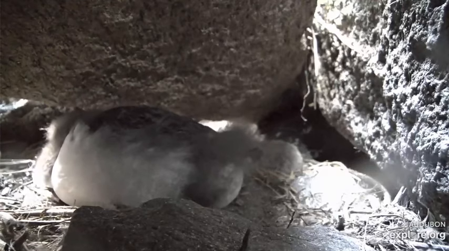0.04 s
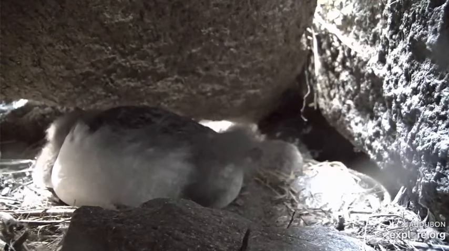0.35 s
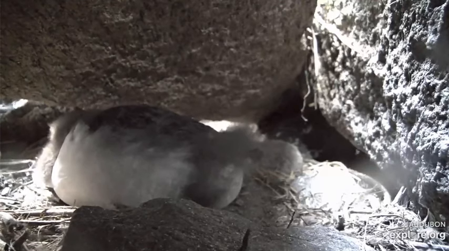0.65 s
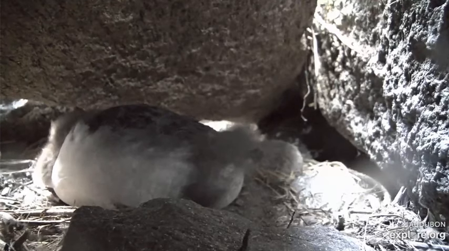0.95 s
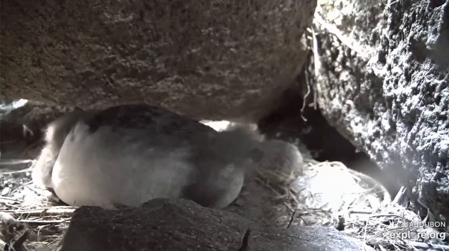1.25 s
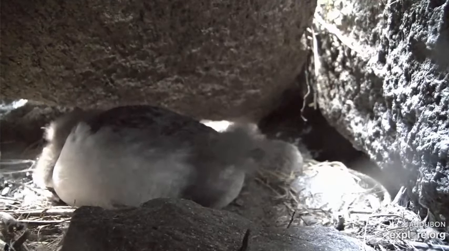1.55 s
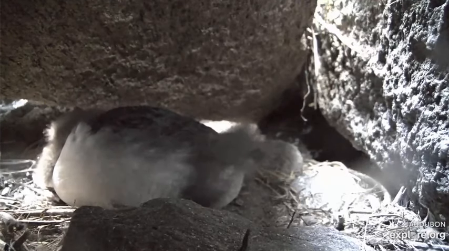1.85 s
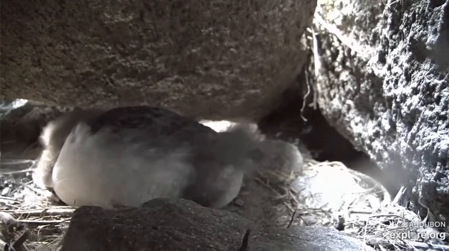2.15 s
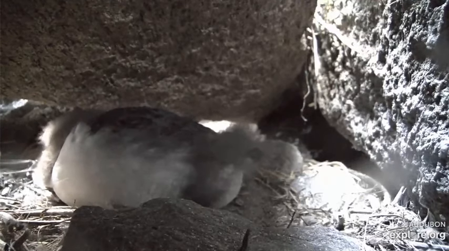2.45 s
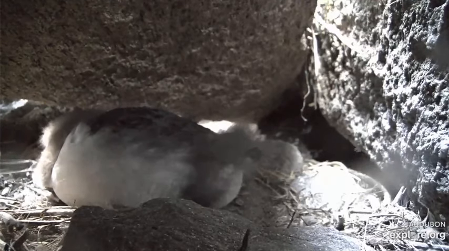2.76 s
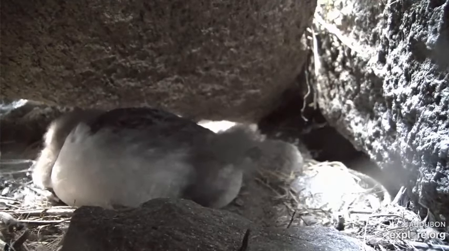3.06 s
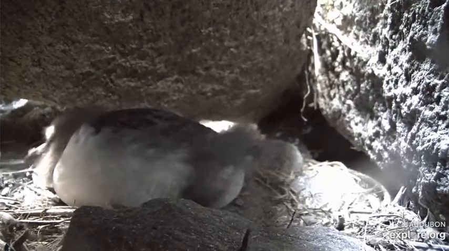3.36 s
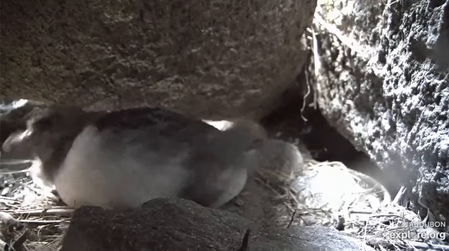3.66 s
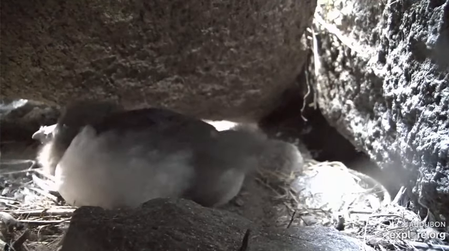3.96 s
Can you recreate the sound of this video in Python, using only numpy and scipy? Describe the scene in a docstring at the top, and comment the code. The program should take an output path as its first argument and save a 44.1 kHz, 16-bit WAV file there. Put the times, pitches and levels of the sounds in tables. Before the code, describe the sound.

Rapid dry knocks and scuffs, about twelve a second, ring briefly inside a stone burrow, thinning a little after 2 seconds. A seabird's whistle falls and breaks into a pulsing rasp in the first half second, the loudest call. Others come around 1.2, 2.7 and 3.7 seconds, with fainter trembling calls near 2 seconds. A dull shore hush and very faint microphone hiss lie underneath.

```python
"""Inside a seabird burrow under boulders, heard from a camera's microphone in the stone cavity.
A rapid run of dry knocks and scuffs, about twelve a second, rings briefly off the rock.
Seabirds give long calls that start as a clean whistle, fall in pitch and break into a pulsing rasp.
Under it lie the dull hush of the shore outside and the camera's own faint hiss and whine."""
import sys
import numpy as np
from scipy import signal
from scipy.fft import rfft, irfft, next_fast_len
from scipy.io import wavfile
from scipy.ndimage import uniform_filter1d, map_coordinates

SR = 44100
rng = np.random.default_rng(int(sys.argv[2]) if len(sys.argv) > 2 else 0)


def dump(signal):
    """Clip the signal to [-1, 1] and save it as 16-bit WAV at the path in sys.argv[1]."""
    limited = np.clip(np.atleast_2d(signal).T, -1, 1)
    pcm = np.round(limited * 32767).astype(np.int16)
    wavfile.write(sys.argv[1], SR, pcm)


N = 176400


def amp(db):
    """Decibels to gain."""
    return 10 ** (np.asarray(db) / 20)


def along(points, hz):
    """Read (Hz, value) points on a log frequency axis."""
    freqs, values = np.transpose(points)
    return np.interp(np.log(hz + 1), np.log(freqs + 1), values)


def wobble(rate, size):
    """A smooth random curve, rate knots a second."""
    return map_coordinates(rng.standard_normal(8192), [np.arange(size) * rate / SR], mode="wrap")


def causal(gain):
    """The minimum-phase response with this gain: it rings only after it is struck."""
    cepstrum = irfft(np.log(np.maximum(gain, 1e-6)))
    half = len(cepstrum) // 2
    cepstrum[1:half] *= 2
    cepstrum[half + 1:] = 0
    return np.exp(rfft(cepstrum))


def add(track, start_s, sound):
    """Mix a sound into the track from start_s."""
    i = max(0, round(start_s * SR))
    track[i:i + len(sound)] += sound[:len(track[i:])]


# The cavity's resonances at the microphone. Each row: frequency in Hz, relative gain in dB.
CAVITY_COLOUR = [(60, -50), (130, -30.5), (195, -27), (270, -16.5), (440, -20.5), (590, -18.5),
                 (660, -10.5), (735, -17.5), (795, -13), (860, -14.5), (980, -4), (1230, 2), (1350, -5.5),
                 (1510, -15.5), (1680, -16.5), (1880, -1.5), (2100, -1.5), (2300, -11), (2550, -3),
                 (2820, -2.5), (3250, -16.5), (3550, -17.5), (3800, -24), (4600, -22), (5100, -13),
                 (5550, -12), (6050, -19.5), (6600, -41.5), (8000, -55.5), (12000, -74)]
# The shore outside, before the cavity colours it. Each row: frequency in Hz, relative level in dB.
SHORE_COLOUR = [(20, -7), (48, 26.5), (105, 24), (290, 3), (500, 4), (800, -2), (1220, -5.5), (1600, 1),
                (2000, -2), (2900, 2.5), (4000, 2.5), (5600, -8.5), (7000, 15)]


def shore_hush():
    """The shore heard from under the boulders: dull noise through the cavity, swaying slightly."""
    size = next_fast_len(N + SR // 2)
    hz = np.fft.rfftfreq(size, 1 / SR)
    colour = amp(along(CAVITY_COLOUR, hz) + along(SHORE_COLOUR, hz))
    hush = irfft(rfft(rng.standard_normal(N), size) * colour, size)[:N]
    level_db = -67.5 + 1.3 * wobble(7.4, N)
    return amp(level_db) * hush / np.sqrt(np.mean(hush ** 2))


def camera_noise(hiss_db=-94.5, whine_db=-89, whine_hz=15735):
    """Right at the microphone: the camera's white hiss and a thin, high whine."""
    hiss = amp(hiss_db) * rng.standard_normal(N)
    whine = np.sqrt(2) * np.sin(2 * np.pi * whine_hz * np.arange(N) / SR)
    return hiss + amp(whine_db + 2.5 * wobble(34, N)) * whine


# Where thud, knock, clack and tick meet. Each entry: a crossover in Hz.
CROSSOVERS_HZ = [627, 1834, 4160]
# Knocking inside the burrow. Each row: time in seconds, then thud, knock, clack and tick levels in dB.
CONTACTS = [(0.058, -95, -60.5, -52.5, -63.5), (0.132, -72, -61.5, -50.5, -67),
            (0.216, -84, -55, -49.5, -60.5), (0.226, -73, -50.5, -42.5, -56),
            (0.373, -67.5, -68, -44, -71.5), (0.521, -71, -48.5, -51.5, -66.5), (0.583, -75, -54, -51, -59),
            (0.595, -64.5, -41.5, -51, -60.5), (0.659, -71, -50.5, -49.5, -57.5),
            (0.673, -67.5, -49, -71, -68.5), (0.748, -71, -52.5, -57, -75), (0.811, -78, -45.5, -46, -49.5),
            (0.825, -66, -38.5, -46, -56.5), (0.896, -64.5, -50, -51.5, -67),
            (0.959, -98, -49.5, -56, -51.5), (0.974, -68.5, -46, -45, -64), (1.05, -65.5, -47, -41.5, -58),
            (1.125, -70.5, -42.5, -41.5, -63.5), (1.199, -77.5, -51, -38, -58),
            (1.211, -68, -43.5, -43, -53.5), (1.281, -75, -45, -43, -65), (1.293, -63.5, -46.5, -51, -57.5),
            (1.364, -77, -45, -46, -59), (1.377, -61, -42.5, -41.5, -53.5),
            (1.458, -72, -46.5, -49.5, -67.5), (1.531, -77.5, -54.5, -48, -70),
            (1.541, -54.5, -41.5, -39.5, -51), (1.617, -72, -58, -43.5, -55), (1.629, -68, -48.5, -45, -63),
            (1.717, -66.5, -53.5, -51.5, -56.5), (1.789, -77, -47.5, -53.5, -57),
            (1.805, -65, -51.5, -51, -63), (1.895, -75, -56, -69, -71), (1.984, -73, -51.5, -57, -76),
            (2.072, -72, -60, -57.5, -78), (2.238, -67.5, -58, -52, -73), (2.321, -71.5, -40, -46, -76),
            (2.328, -70, -46, -38, -52.5), (2.503, -82, -55, -59.5, -66.5), (2.59, -70.5, -40, -72.5, -72),
            (2.596, -80, -51, -41.5, -54.5), (2.685, -86, -68.5, -56, -75), (2.769, -77, -59, -61, -65),
            (2.861, -77, -63.5, -50, -67), (2.946, -58, -45, -37, -56), (3.036, -73.5, -71, -54.5, -72),
            (3.128, -75, -61.5, -64, -70), (3.216, -63, -43, -51, -62.5), (3.307, -69.5, -48.5, -53, -63.5),
            (3.491, -64, -37.5, -41.5, -54.5), (3.574, -83.5, -59.5, -71.0, -74.5),
            (3.757, -66, -47.5, -64, -71), (3.763, -79, -48.5, -43, -64), (3.859, -76, -46, -47, -59)]


def knocks(dull_hz=6950, ripple_db=4, ripple_spacing_hz=167.95):
    """Each contact is a short crunch in a softer scuff, cavity-coloured, with its own four band levels."""
    size, pre_s, lead_s = 8192, 0.03, 0.0028
    level_s = 0.008  # a band's level is its energy spread over this time
    t = np.arange(size) / SR - pre_s
    hz = np.fft.rfftfreq(size, 1 / SR)

    def swell(rise_s, t60_s):
        return amp(np.where(t < 0, 10 * t / rise_s, -60 * t / t60_s))

    blow = swell(rise_s=0.0018, t60_s=0.035)
    scuff = amp(-5) * swell(rise_s=0.0027, t60_s=0.07)
    lowpasses = [1 / (1 + (hz / edge) ** 20) for edge in CROSSOVERS_HZ]
    cavity = amp(along(CAVITY_COLOUR, hz)) / np.sqrt(1 + (hz / dull_hz) ** 10)
    bands = np.diff([np.zeros_like(hz), *lowpasses, np.ones_like(hz)], axis=0) * cavity
    out = np.zeros(N)
    for time_s, *levels_db in CONTACTS:
        grain = amp(4 * wobble(300, size))
        crunch = rfft((blow + scuff * grain) * rng.standard_normal(size))
        # each contact excites the resonances differently
        crunch *= causal(amp(ripple_db * wobble(SR * hz[1] / ripple_spacing_hz, len(hz))))
        band_rms = np.linalg.norm(irfft(crunch * bands), axis=1) / np.sqrt(level_s * SR)
        colour = (amp(levels_db) / band_rms) @ bands
        add(out, time_s - lead_s - pre_s, irfft(crunch * causal(colour)))
    return out


# The third harmonic comes out as the whistle rises. Each row: pitch in Hz, added gain in dB.
THIRD_LIFT = [(1400, -54.5), (1500, -39.5), (1620, -20.5), (1670, 4), (1700, 3.5)]


def seabird_call(fundamental_db, third_db, grit_db, flutter, contour):
    """Start time and sound of a trembling whistle that roughens into jitter, throb, rasp and grit."""
    throb_hz, tremble_hz, grit_hz = 64.36, 52.14, 3464
    fade_s, break_roughness = 0.0031, 0.19
    times, *columns = np.transpose(contour)
    t = np.arange(times[0] - fade_s, times[-1] + fade_s, 1 / SR)
    n = len(t)
    curves = [np.interp(t, np.sort(times), column) for column in columns]
    pitch, second_db, rough = uniform_filter1d(curves, round(fade_s * SR))
    rough = np.clip(rough, 0, 1)
    depth = np.sqrt(rough)

    def drifting_beat(hz):
        return np.sin(2 * np.pi * np.cumsum(hz * (1 + 0.14 * wobble(50, n))) / SR)

    def noise_around(angle, rate):
        return wobble(rate, n) * np.sin(angle) + wobble(rate, n) * np.cos(angle)

    throb, tremble = drifting_beat(throb_hz), drifting_beat(tremble_hz)
    jitter = 0.063 * wobble(900, n)
    phase = 2 * np.pi * np.cumsum(pitch * (1 + depth * (jitter + 0.017 * throb))) / SR
    broken = amp(-31) * np.clip(rough / break_roughness, 0, 1)  # overtones of the breaking voice
    third = broken + amp(third_db + along(THIRD_LIFT, pitch))
    harmonics = {1: amp(fundamental_db), 2: 1, 3: third, 4: broken, 6: broken * amp(-25)}
    rasp_share = 0.92 * rough
    voice = np.zeros(n)
    for k, gain in harmonics.items():
        whistle = np.sqrt(2 * (1 - rasp_share)) * np.sin(k * phase)
        rasp = np.sqrt(rasp_share) * noise_around(k * phase, rate=375 if k == 1 else 750)
        voice += gain * (whistle + rasp)
    puffs = depth * (1 + throb) / 2  # each throb sounds a noisy upper resonance
    grit = amp(grit_db) * puffs * noise_around(2 * np.pi * grit_hz * t, rate=520)
    from_edge_s = np.minimum(t - t[0], t[-1] - t)
    fade = np.sin(np.pi / 2 * np.clip(from_edge_s / fade_s, 0, 1)) ** 2
    pulsing = (1 + 0.85 * depth * throb) * (1 + flutter * (1 - depth) * tremble)
    return t[0], (amp(second_db) * voice + grit) * fade * pulsing


# Birds heard in the burrow. Each row: fundamental and third harmonic (before its lift) in dB against
# the second, grit gain in dB, flutter from 0 to 1, contour. Each contour row: time in seconds,
# pitch in Hz, second harmonic level in dB, roughness from 0 (clean) to 1 (fully rough).
CALLS = [ (-15.5, -9.5, -66.5, 0.042, [(.078, 1300, -46, 0.07), (.096, 1587, -41, 0), (.112, 1629, -40, 0),
         (.166, 1550, -33, 0), (.182, 1514, -36.5, 0.02), (.215, 1491, -42.5, 0), (.25, 1544, -38.5, 0),
         (.287, 1441, -37, 0.1), (.305, 1325, -33, 0.14), (.335, 1305, -35.5, 0.22), (.37, 1248, -42, 0.42),
         (.4, 1232, -44, 0.94), (.436, 1355, -43.5, 1.04), (.46, 1326, -64, 0.3)]),
         (-14, -10, -92, 0.69, [(.545, 1334, -53, 0), (.582, 1217, -56.5, 0.3)]),
         (-16, -2, -81, .1, [(1.145, 1640, -59, 0), (1.18, 1570, -67, 0), (1.21, 1505, -59, 0.01),
         (1.28, 1487, -53, 0.08), (1.326, 1454, -54, 0.02), (1.338, 1356, -45.5, 0.04),
         (1.385, 1212, -48.5, 0.12), (1.425, 1185, -51, 0.26), (1.47, 1069, -52.5, 0.37)]),
         (-7.5, -1.5, -84, 0.92, [(1.81, 1734, -76, 0), (1.85, 1766, -71.5, 0.14), (1.93, 1720, -79, 0),
         (2.035, 1590, -67.5, 0.24)]), (-23.5, -2, -73, 0.94, [(2.045, 1220, -61.5, 0.37),
         (2.1, 1380, -64, 0.52), (2.19, 1420, -55.5, 0.15), (2.28, 1444, -72.5, .9)]),
         (-27, -24, -76, 0.52, [(2.19, 1770, -67, 0), (2.26, 1700, -76, 0.2), (2.305, 1760, -74, 0.01),
         (2.355, 1610, -74, 0), (2.41, 1460, -57.5, 0), (2.46, 1460, -76, 0.52), (2.53, 1466, -66.5, 0),
         (2.565, 1460, -77, 0.14)]), (-31, -25, -78, 0.52, [(2.3, 1280, -66, .3), (2.46, 1250, -71, 0.36)]),
         (-25, -4.5, -57.5, 0.61, [(2.653, 1700, -56.5, 0.01), (2.688, 1787, -61.5, 0),
         (2.735, 1720, -54, 0.01), (2.79, 1683, -63, 0.05), (2.815, 1660, -59, 0.2), (2.847, 1550, -47, 0),
         (2.856, 1315, -44, 0.2), (2.91, 1340, -44.5, 0.19), (2.95, 1363, -46, 0.41),
         (3.01, 1382, -47.5, 0.52), (3.06, 1373, -56, 0.85), (3.102, 1364, -66, 0.7)]),
         (8, -1, -89, 0.27, [(3.15, 1570, -82, 0.1), (3.175, 1619, -80, 0.08), (3.38, 1573, -78, 0.02)]),
         (-15, -17, -82, 0.46, [(3.385, 1300, -59.5, 0.2), (3.41, 1204, -64, 0.25)]),
         (-43, 8, -72, 0.25, [(3.666, 1080, -51, 0.11), (3.68, 1025, -54.5, 0.11)]),
         (-24, -10, -77, .5, [(3.69, 1450, -66.5, 0.86), (3.87, 1430, -59.5, 0.46)]),
         (-16, 10, -72, 0.56, [(3.695, 1564, -61.5, 0.11), (3.714, 1715, -64, 0), (3.77, 1700, -65, 0.03),
         (3.83, 1685, -75, 0.04), (3.87, 1620, -50, .08), (3.895, 1477, -42.5, .17),
         (3.935, 1324, -37.5, 0.19), (3.975, 1360, -45, 0.1), (4, 1420, -40.5, 0)]),
         (-8, -1, -76, 0.41, [(3.964, 1700, -57, 0.11), (4, 1770, -57.5, 0.05)]), ]
# Echoes off boulders near the microphone. Each row: delay in seconds, gain in dB.
BOULDER_ECHOES = [(.0047, -16), (0.02, -18.5)]


def seabirds():
    """Each call reaches the microphone directly, then again off the boulders."""
    out = np.zeros(N)
    for row in CALLS:
        start_s, voice = seabird_call(*row)
        add(out, start_s, voice)
        for delay_s, db in BOULDER_ECHOES:
            add(out, start_s + delay_s, amp(db) * voice)
    return out


def chamber_ring(sound, t60_s=0.24, build_s=0.0061):
    """The short diffuse ring of the rock all round the microphone."""
    t = np.arange(SR // 2) / SR
    tail = rng.standard_normal(len(t)) * amp(-60 * t / t60_s) * (1 - np.exp(-t / build_s))
    return signal.fftconvolve(sound, tail / np.linalg.norm(tail))[:N]


def scene():
    """One microphone in the burrow: nearly dry knocks and more ringing calls over hush and hiss."""
    knocking, calling = knocks(), seabirds()
    ring = chamber_ring(amp(-21.5) * knocking + amp(-7) * calling)
    return (shore_hush() + camera_noise() + knocking + calling + ring)[None]


def record(dry):
    """The camera cuts off steeply above its band limit."""
    top_hz = 15900
    lowpass = signal.ellip(10, 0.1, 70, top_hz, fs=SR, output="sos")
    return signal.sosfilt(lowpass, dry)


dry = scene()
out = record(dry)
dump(out)
```